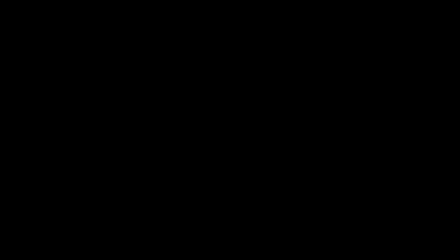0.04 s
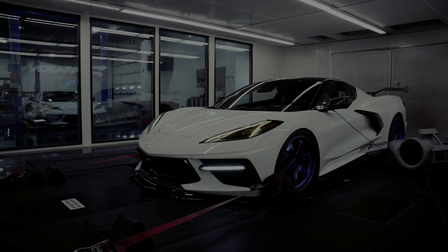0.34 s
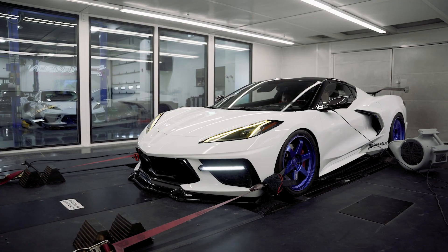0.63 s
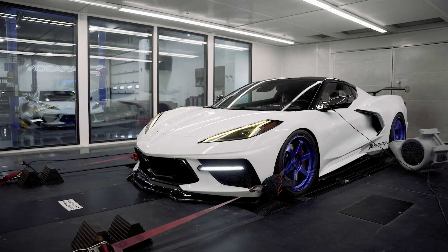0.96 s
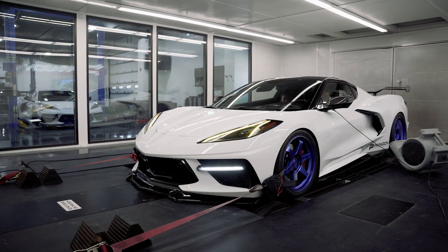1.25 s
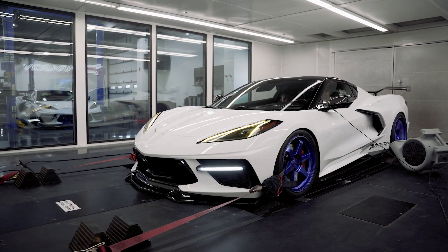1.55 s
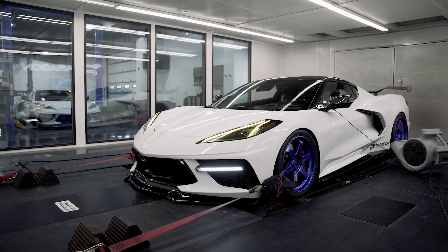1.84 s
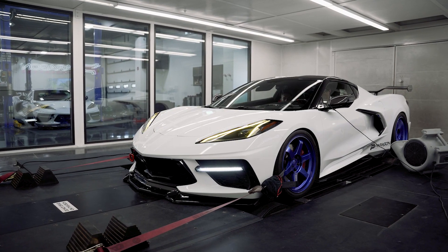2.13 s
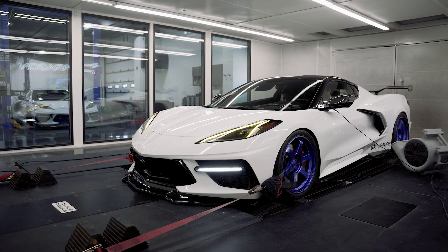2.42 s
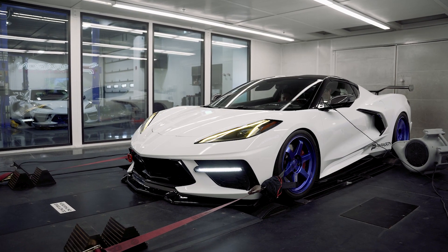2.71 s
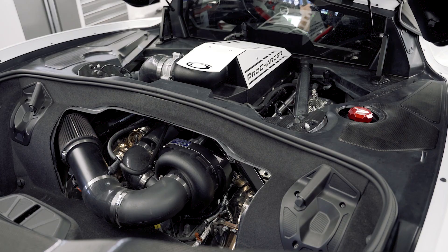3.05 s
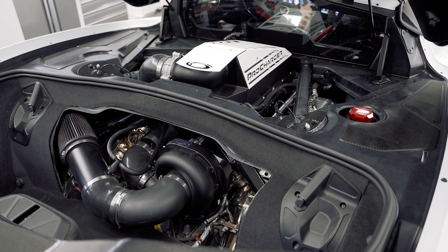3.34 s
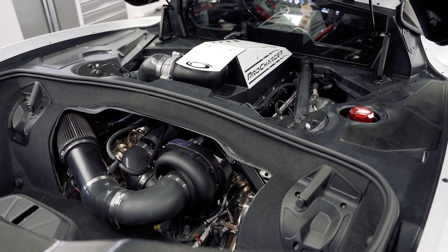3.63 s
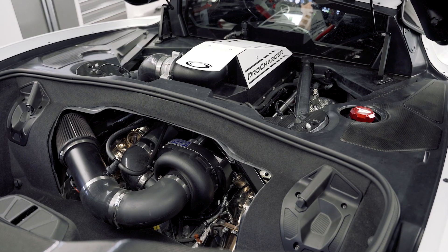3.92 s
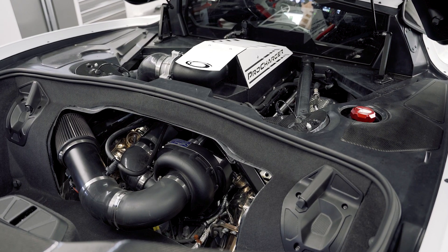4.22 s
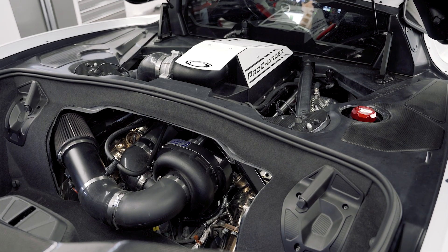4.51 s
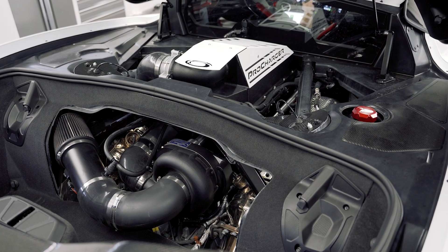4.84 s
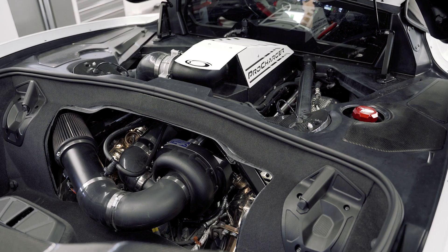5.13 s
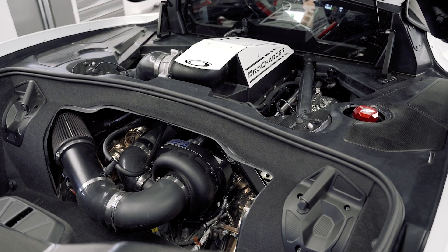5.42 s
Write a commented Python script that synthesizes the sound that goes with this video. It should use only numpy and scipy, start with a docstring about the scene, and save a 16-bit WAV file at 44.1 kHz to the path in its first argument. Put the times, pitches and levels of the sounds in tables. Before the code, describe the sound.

A supercharged V8 engine fades in, then accelerates at full throttle in an enclosed room, its drone and whine climbing steadily in pitch.

```python
"""A closed test bay, hard walls close by, one microphone in the room with a supercharged V8 on a
rolling road. The engine fades in at a cruise, then pulls at full throttle. Strong crank orders drone
through the room's resonances; unequal cylinders add burble and bark between them, exhaust gas rasps
in time with the firings, and the belt-driven blower whines and hisses far above them in pitch."""
import sys
import numpy as np
from scipy import signal
from scipy.fft import rfft
from scipy.io import wavfile
from scipy.ndimage import uniform_filter1d, minimum_filter1d, map_coordinates

SR = 44100
rng = np.random.default_rng(int(sys.argv[2]) if len(sys.argv) > 2 else 0)


def unload_wav(signal):
    """Save mono or channel-first audio to the path in sys.argv[1] as 16-bit WAV at rate SR, clipped to [-1, 1]."""
    wavfile.write(
        sys.argv[1],
        SR,
        np.round(np.clip(np.atleast_2d(signal).T, -1, 1) * 32767).astype(np.int16),
    )


N = 245536
T = np.arange(N) / SR

# crank turns per second: t/s, f/Hz
CRANK_SPEED = [(0.0, 33.9), (0.65, 35.2), (0.8, 35.9), (1.0, 38.47), (1.3, 42.17), (1.6, 46.44),
               (2.0, 52.12), (2.4, 57.65), (2.8, 64.16), (3.2, 69.35), (3.6, 76.13), (4.0, 82.82),
               (4.4, 87.87), (4.8, 94.9), (5.2, 100.6), (5.56, 105.6)]
# exhaust drone before the room shapes it, order 4 being the firing rate:
# crank order, full-throttle level/dB, change at cruise/dB, change per doubling of revs/dB
DRONE_ORDERS = [(1, -22, -24, 10), (2, -18, -10, 10.5), (3, -22.5, 0.5, 10), (4, -10, -12.5, -1.5),
                (5, -21, -7.5, -0.5), (6, -22, -17, -1), (7, -30, 5.5, 5), (8, -22.5, -35.5, -6)]
# standing waves of the bay: f/Hz, width/Hz, level/dB
ROOM_MODES = [(59.3, 4.9, -4.5), (95.8, 8.6, 0.2), (110.9, 12, 1.5), (150.6, 17, -7.5), (176.4, 8.5, -15),
              (257.8, 20.2, -0.37), (292.27, 9.3, -8.5), (343, 21, -5.5), (385, 5.8, -18), (429, 22, -17),
              (490, 25, -9), (558, 11, -7.5), (749, 79, -7.5)]
# dips where wall echoes cancel the direct sound at the microphone: f/Hz, width/Hz, level/dB
ROOM_NULLS = [(55.2, 4, -8), (82, 11.3, -8.5), (133.6, 11, -10), (173.2, 3.3, -12), (188.2, 12.5, -4),
              (227.7, 10.4, -6.5), (326, 15, -2), (378.3, 12, -9), (402, 12.77, -14)]
# orders that the firing sequence favours or cancels: crank order, level/dB
FIRING_ORDERS = [(1.5, -4.5), (3.5, -9.5), (4.5, -0.5), (5.5, -0.5), (6.5, 1.5), (9, 7.5), (10, 6),
                 (10.5, 5), (11, 4.5), (12, 3.5), (12.5, 5), (13.5, 1.5), (14, -5), (14.5, 10.5), (15, 0.5),
                 (15.5, 0.5), (17, 4), (19, 9.5), (21, 0), (22.5, 1.5), (24, 8), (25, 3)]
# resonances of the pipes and the bay: f/Hz, width/Hz, level/dB
PIPE_MODES = [(111, 18, 5), (255, 10.8, 6), (308, 7.4, -5.5), (348.5, 11, -3), (427, 17.7, -2.5),
              (518, 38, -5.5), (563, 16, -5), (713, 80, -10), (832, 58, -13), (1006, 107, -9),
              (1120, 47, -12.5), (1263, 110, -21), (1423, 220, -18), (1713.4, 18, -13), (1838, 31, -11),
              (1990, 86, -20.5), (2600, 420, -33.5)]
# spectra of pipe rumble, exhaust rasp, intake hiss and air jet: f/Hz, relative level/dB
RUMBLE_SPECTRUM = [(20, -34.5), (45, -4), (90, 5), (260, -3.5), (400, 7.5), (600, -9), (1200, -52.5)]
RASP_SPECTRUM = [(250, -14), (470, -11.5), (640, -4.5), (850, -4.5), (1060, -3), (1300, -8), (1550, -16),
                 (1900, -9), (2400, -18.5), (4000, -51)]
HISS_SPECTRUM = [(1000, -2), (2100, 0.5), (2700, -2), (3200, -5), (4300, -6), (5300, -13), (7000, -19.5),
                 (10000, -28), (16000, -48)]
JET_SPECTRUM = [(3000, -9.5), (6500, -3.5), (9000, -3), (12500, -10), (15500, -10)]
# tones of the pulleys and timing gears: crank order, relative level/dB
GEAR_TONES = [(21.85, -14.5), (29.08, -14.5), (36.3, -13.5), (43.6, -16.5), (51, -21), (61.2, -20),
              (64.5, -15.5)]
# resonances of the blower casing and belt cover: f/Hz, width/Hz, level/dB
CASING_MODES = [(1940, 1700, 5), (2840, 120, 3.5), (4230, 200, -4), (5500, 1700, -2.5)]
# tones of the blower blades: crank order, relative level/dB
BLADE_TONES = [(108, -8), (112.6, -2), (117.6, -1.5), (122.3, -.5), (127.3, -3), (129.3, -6), (184, -15)]

# gain of each part: at full throttle and MID_REVS_HZ/dB, change at cruise/dB, per doubling of revs/dB
BURBLE, BARK, PIPE_RUMBLE = (-32, -19.5, -3), (-29, -10.5, 9.7), (-36, -2.4, 11)
INTAKE_HISS, AIR_JET = (-36.5, 1, 13.2), (-55.5, 2.5, 11)
GEAR_WHINE, BLADE_WHINE, BLADE_EDDIES = (-37.3, 0, 11.5), (-61, -5, 2), (-65.5, 0, 6)
MID_REVS_HZ = 70
FADE_IN_S, THROTTLE_FROM_S, THROTTLE_FULL_S = 0.82, 0.6, 0.952


def undb(db):
    """Decibels to gain."""
    return 10 ** (np.asarray(db) / 20)


def drift(rate_hz):
    """Smooth random wander around zero."""
    return 1.5 * map_coordinates(rng.standard_normal(4096), [T * rate_hz], order=3, mode="wrap")


def effort(crank_hz, law):
    """Gain of one part of the engine as the throttle opens and the revs climb."""
    full_db, cruise_db, doubling_db = law
    cruising = np.interp(T, [THROTTLE_FROM_S, THROTTLE_FULL_S], [1, 0])
    return undb(full_db + cruise_db * cruising + doubling_db * np.log2(crank_hz / MID_REVS_HZ))


def resonance(hz, modes):
    """How strongly a set of resonances answers at a frequency."""
    grid_hz = np.arange(0, 8000, 2.)
    power = sum(undb(db) ** 2 / (1 + ((grid_hz - f) * 2 / width) ** 2) for f, width, db in modes)
    return np.interp(hz, grid_hz, np.sqrt(power))


def room_response(hz):
    """How a low tone carries across the bay to the microphone: standing waves with nulls between."""
    null_db = sum(db * np.exp(-((hz - f) * 2 / width) ** 2) for f, width, db in ROOM_NULLS)
    return resonance(hz, ROOM_MODES) * undb(null_db)


def exhaust_drone(turns, crank_hz):
    """Eight crank orders, each swelling as it crosses a room mode; together they throb once a turn."""
    drone = 0
    for order, (_, *law) in enumerate(DRONE_ORDERS, 1):
        hz = order * crank_hz
        # the bay delays every order differently, so the pulses reach the microphone rounded
        phase = 2 * np.pi * (order * turns + rng.uniform(0, 0.28))
        ripple = np.interp(hz, [243, 465], [0.46, 2.5])  # higher tones waver more
        flicker_db = 0.45 * drift(20) + ripple * drift(10)
        rms = effort(crank_hz, law) * room_response(hz) * undb(flicker_db)
        drone += rms * np.sqrt(2) * np.sin(phase)
    return drone


def cruise_whistle(hz=2136, level_db=-52, end_s=0.92, release_s=0.35):
    """A thin whistle and its octave, dying away as the throttle opens."""
    phase = 2 * np.pi * (hz * T + 0.094 * drift(40))
    release = np.clip((end_s - T) / release_s, 0, 1)
    return release * undb(level_db + 2 * drift(13)) * (np.sin(phase) + undb(-10) * np.sin(2 * phase))


def wall_echoes(x, t60_s, wet_db):
    """What reaches the microphone: the direct sound plus dense echoes off close, hard walls."""
    t = T[:SR // 2]
    tail = rng.standard_normal(len(t)) * undb(-60 * t / t60_s) * (t > 0.004)
    return x + undb(wet_db) * signal.fftconvolve(x, tail / np.linalg.norm(tail))[:N]


def steady(x, window=11025):
    """Hold a signal near rms 1 over quarter seconds."""
    power = uniform_filter1d(uniform_filter1d(x * x, window), window)
    return x / np.sqrt(power + 1e-18)


def uneven_firing(turns, crank_hz):
    """Unequal cylinders repeat every two turns, so half orders sound: a low burble and a higher bark."""
    firing_db = dict(FIRING_ORDERS)
    burble, bark = 0, 0
    for order in np.arange(3, 64) / 2:
        if order <= 8 and order % 1 == 0:
            continue  # these whole orders make the drone
        hz = order * crank_hz
        phase = 2 * np.pi * (order * turns + rng.random())
        tone = undb(firing_db.get(order, 0)) * resonance(hz, PIPE_MODES) * np.cos(phase)
        bark_share = np.clip((hz - 430) / 90, 0, 1)
        burble += (1 - bark_share) * tone
        bark += bark_share * tone
    burble = wall_echoes(burble, t60_s=0.06, wet_db=-13)
    bark = wall_echoes(bark, t60_s=0.33, wet_db=-5)
    return steady(burble), steady(bark)


def gas_noise(spectrum):
    """Rushing gas: noise of rms 1 with the given spectrum."""
    hz, db = np.transpose(spectrum)
    bins_hz = np.fft.rfftfreq(N, 1 / SR)
    gain = undb(np.interp(np.log(bins_hz + 1), np.log(hz), db))
    noise = np.fft.irfft(rfft(rng.standard_normal(N)) * gain, N)
    return noise / noise.std()


def puffs(turns, per_turn, per_cycle, per_firing):
    """Gas flow swells once a turn, once a two-turn cycle and with each firing."""
    angle = 2 * np.pi * turns
    swell = per_turn * np.cos(angle) + per_cycle * np.cos(angle / 2) + per_firing * np.cos(4 * angle)
    flow = np.exp(swell)
    return flow / np.sqrt(np.mean(flow ** 2))


def exhaust_rasp(turns):
    """Gas leaves the pipes in a hard puff at each firing."""
    return gas_noise(RASP_SPECTRUM) * puffs(turns, per_turn=0.11, per_cycle=0.042, per_firing=0.54)


def intake_air(turns, crank_hz):
    """The intake hisses with a thin jet of air above it, both pulsing gently with the engine."""
    hiss = gas_noise(HISS_SPECTRUM) * puffs(turns, per_turn=0.06, per_cycle=0.052, per_firing=0.064)
    jet = gas_noise(JET_SPECTRUM) * puffs(turns, per_turn=0.08, per_cycle=0.06, per_firing=0.12)
    return effort(crank_hz, INTAKE_HISS) * hiss + effort(crank_hz, AIR_JET) * jet


def belt_tones(turns, tones, flex):
    """Geared tones that waver as the belt flexes and flicker among the wall echoes."""
    whine = 0
    for order, db in tones:
        slip = flex * drift(30)
        whine += undb(db + 2 * drift(6)) * np.sin(2 * np.pi * order * (turns + slip))
    return wall_echoes(whine, t60_s=0.16, wet_db=-4)


def gear_whine(turns, crank_hz):
    """Each gear tone sings out as it climbs through a resonance of the casing."""
    tones = [(order, db + 20 * np.log10(resonance(order * crank_hz, CASING_MODES)))
             for order, db in GEAR_TONES]
    return effort(crank_hz, GEAR_WHINE) * belt_tones(turns, tones, flex=0.0018)


def blower(turns, crank_hz):
    """Blade tones inside a band of turbulence that climbs with them."""
    eddies = map_coordinates(rng.standard_normal(16384), [turns * 22], order=3, mode="wrap")
    turbulence = eddies * np.sin(2 * np.pi * 123 * turns)  # centred on crank order 123
    blades = belt_tones(turns, BLADE_TONES, flex=0.0014)
    return effort(crank_hz, BLADE_WHINE) * blades + effort(crank_hz, BLADE_EDDIES) * turbulence


def scene():
    """The engine as heard at the microphone, in mono; throttle and revs set how hard it sounds."""
    crank_hz = np.interp(T, *np.transpose(CRANK_SPEED))
    turns = np.cumsum(crank_hz) / SR
    # no two combustions are alike, so the pulses come slightly early or late
    shaky_turns = turns + 0.0023 * drift(110)
    burble, bark = uneven_firing(shaky_turns, crank_hz)
    rumble = gas_noise(RUMBLE_SPECTRUM)
    exhaust_low = effort(crank_hz, BURBLE) * burble + effort(crank_hz, PIPE_RUMBLE) * rumble
    exhaust_mid = effort(crank_hz, BARK) * (undb(-1) * bark + undb(-5.5) * exhaust_rasp(shaky_turns))
    # the gas stream surges a little from moment to moment
    surge = undb(0.38 * (drift(50) + drift(20)))
    gas_stream = surge * (exhaust_mid + intake_air(shaky_turns, crank_hz))
    whine = gear_whine(turns, crank_hz) + blower(turns, crank_hz) + cruise_whistle()
    drone = exhaust_drone(shaky_turns, crank_hz)
    fade_in = np.clip(T / FADE_IN_S, 0, 1)
    return (fade_in * (drone + exhaust_low + gas_stream + whine))[None]


def record(dry):
    """After the microphone: a low cut, a fast limiter to hold the peaks, and a steep top cut."""
    ceiling, window = 0.43, 441  # the window spans 10 ms
    low_cut = signal.butter(3, 28, "high", fs=SR, output="sos")
    top_cut = signal.ellip(10, 0.2, 80, 15700, fs=SR, output="sos")
    mic = signal.sosfilt(low_cut, dry)
    gain = np.minimum(1, ceiling / (np.abs(mic) + 1e-9))
    gain = uniform_filter1d(minimum_filter1d(gain, window), window)
    return signal.sosfilt(top_cut, mic * gain)


dry = scene()
out = record(dry)
unload_wav(out)
```